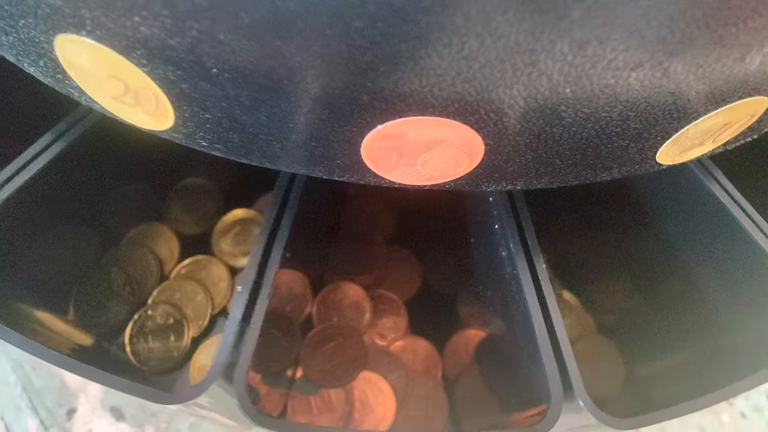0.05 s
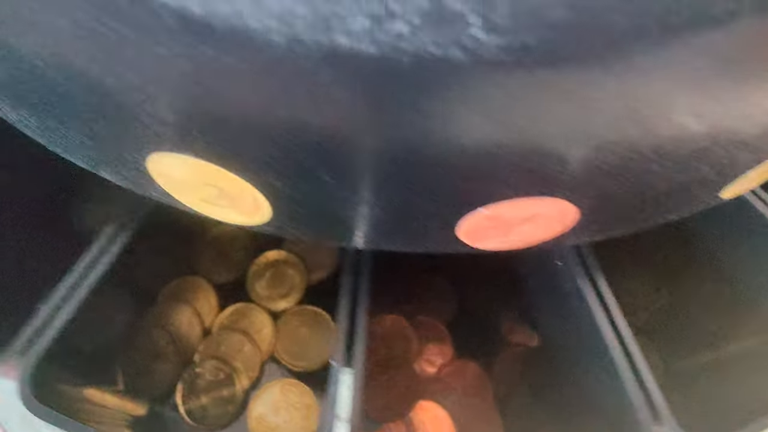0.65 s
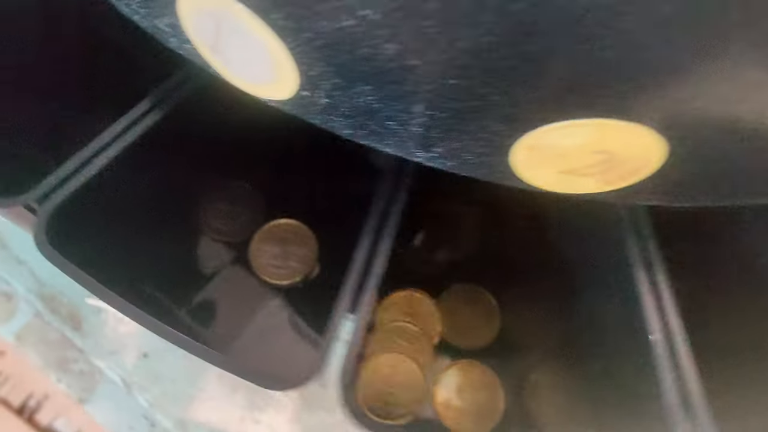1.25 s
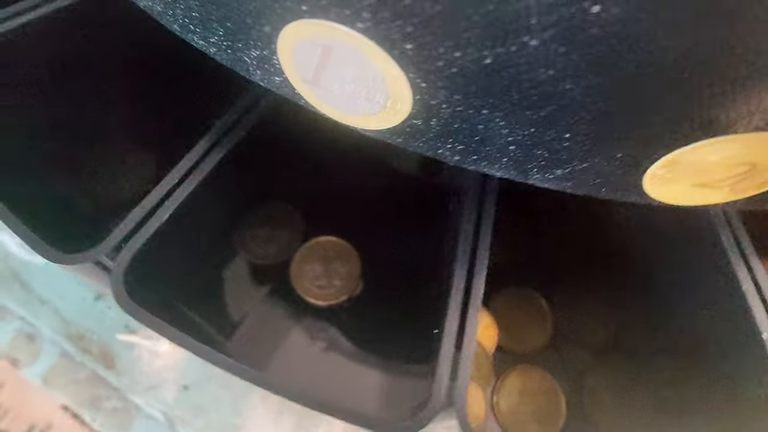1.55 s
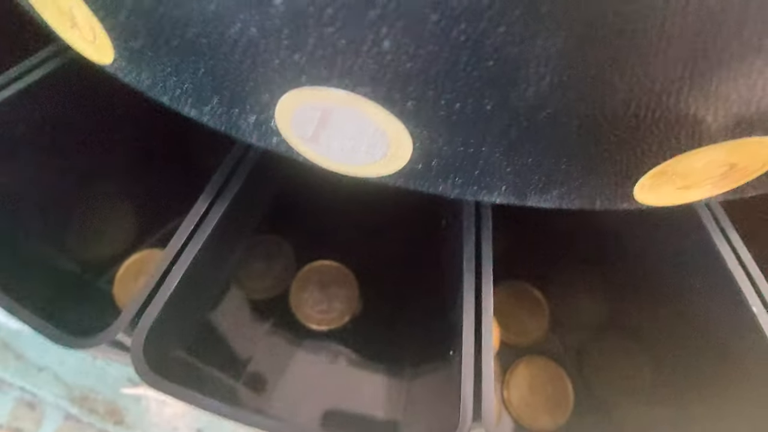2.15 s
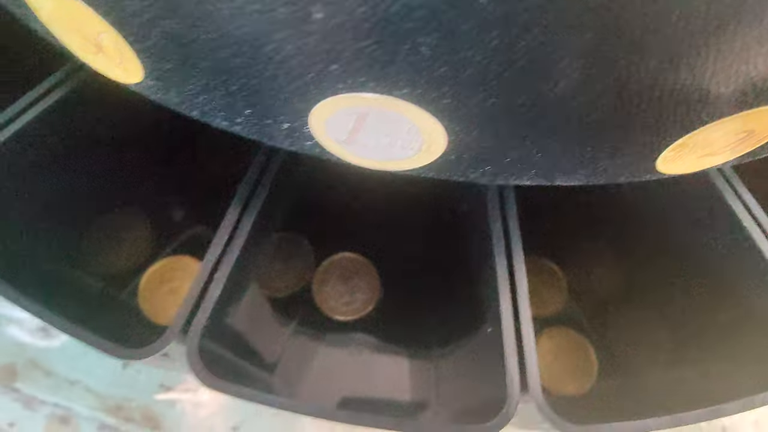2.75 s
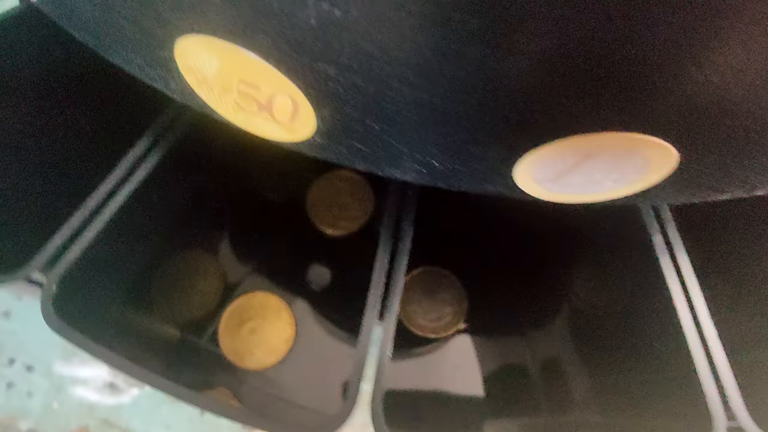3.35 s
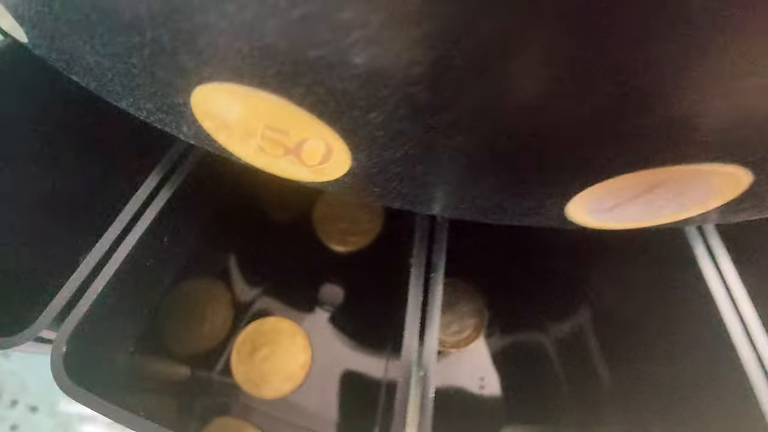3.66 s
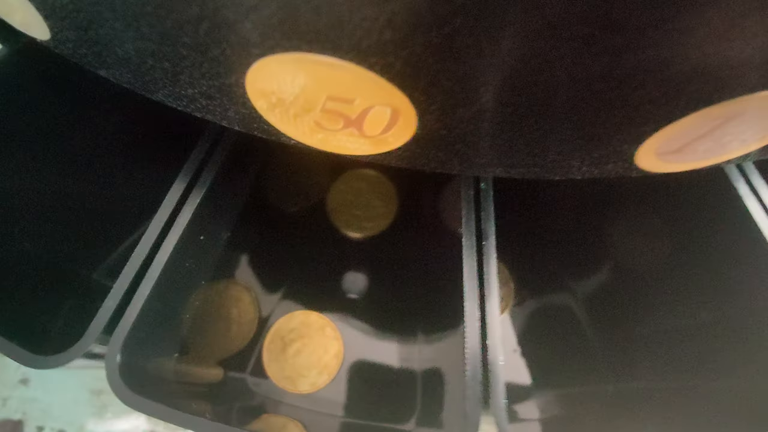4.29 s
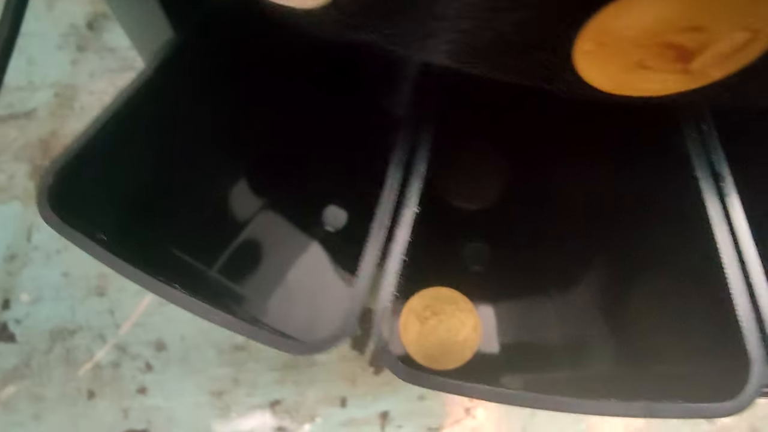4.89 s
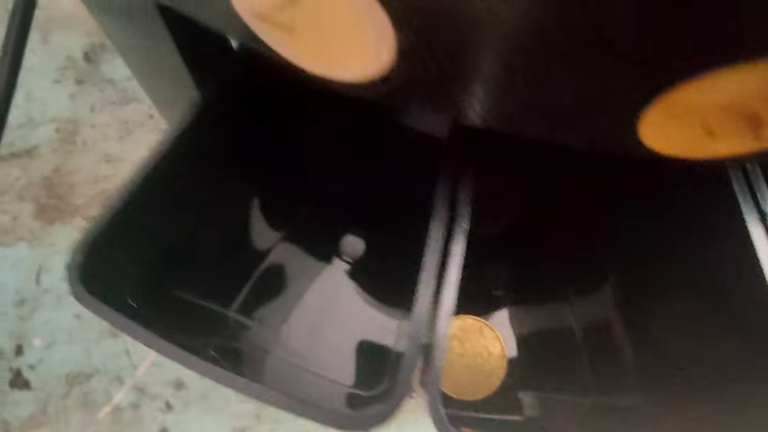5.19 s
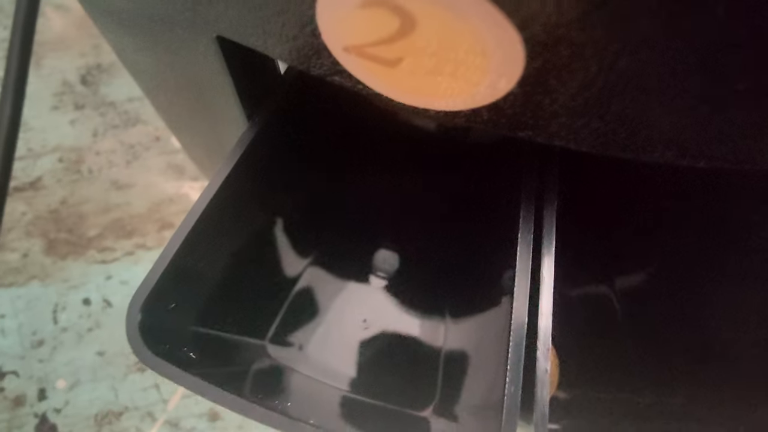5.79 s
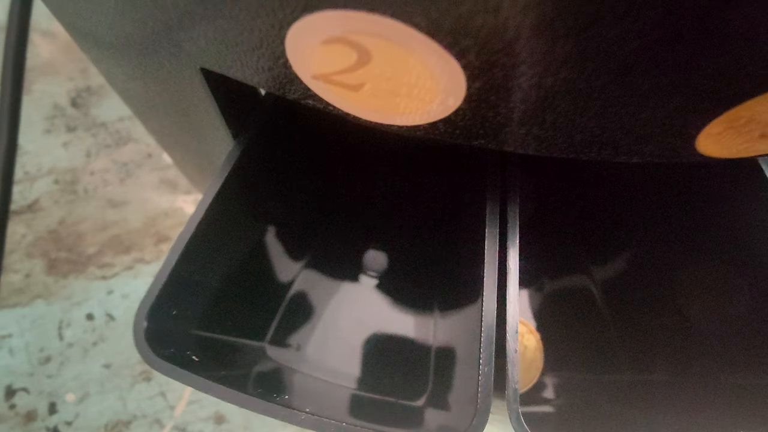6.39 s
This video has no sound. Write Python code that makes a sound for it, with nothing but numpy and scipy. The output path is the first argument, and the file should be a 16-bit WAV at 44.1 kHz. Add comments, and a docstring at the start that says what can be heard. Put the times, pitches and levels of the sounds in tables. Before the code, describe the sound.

An electric coin sorter clatters as coins knock around its plastic housing and clink into bins, stalling briefly to a low hum.

```python
"""Coin sorter, close up

An electric coin sorter in a small room, the stereo microphone just above its bins. Coins churn on the
feed wheel and knock about in the plastic housing; sorted ones drop into the bins, skitter and ring.
The wheel stalls, leaving the motor's mains hum, then takes up again with a few softer knocks."""
import sys
import numpy as np
from scipy import signal
from scipy.fft import rfft, irfft, next_fast_len
from scipy.io import wavfile

SR = 44100
rng = np.random.default_rng(int(sys.argv[2]) if len(sys.argv) > 2 else 0)


def wav_record(signal):
    """Record a signal, one row per channel, as 16-bit PCM in the file named by sys.argv[1]."""
    frames = np.transpose(np.atleast_2d(signal))
    bounded = np.clip(frames, -1, 1)
    # unit amplitude maps onto the largest positive 16-bit level
    quanta = np.round(bounded * 32767).astype(np.int16)
    wavfile.write(sys.argv[1], SR, quanta)


N = 292559
TIME = np.arange(N) / SR
AGE = np.arange(int(.3 * SR)) / SR   # seconds since a blow
STRIKE = int(.012 * SR)   # the opening samples of a blow, which set its level
STALL_S, RESTART_S = 5.36, 6.02   # the wheel stands still between these times


# Coins knocking inside the housing. Each row: start in seconds, level in dB, the spot that is hit.
HOUSING_KNOCKS = [(0.068, -43, "coin"), (0.112, -31, "wheel"), (0.208, -22.5, "wall"),
                  (0.275, -23, "floor"), (0.292, -15.5, "rim"), (0.317, -26, "hub"), (0.373, -27.5, "coin"),
                  (0.501, -21, "floor"), (0.571, -20.5, "rim"), (0.623, -23.5, "floor"),
                  (0.637, -26.5, "floor"), (0.781, -31, "hub"), (0.816, -22.5, "rim"),
                  (0.862, -32, "wheel"), (0.896, -29, "coin"), (0.976, -32, "wheel"), (1.125, -26, "hub"),
                  (1.141, -29.5, "rim"), (1.181, -23, "wheel"), (1.217, -16.5, "rib"),
                  (1.257, -22.5, "wheel"), (1.311, -18.5, "wheel"), (1.326, -24.5, "wall"),
                  (1.38, -26, "floor"), (1.394, -23.5, "coin"), (1.536, -18.5, "wheel"),
                  (1.578, -28.5, "rim"), (1.623, -19, "floor"), (1.642, -27, "coin"), (1.671, -25, "rib"),
                  (1.817, -21.5, "wheel"), (1.898, -27, "edge"), (1.927, -30.5, "coin"),
                  (2.063, -31, "coin"), (2.134, -19, "wall"), (2.192, -25, "edge"), (2.525, -29.5, "wheel"),
                  (2.55, -28, "wall"), (2.634, -19, "wheel"), (2.671, -25, "wheel"), (2.722, -28.5, "rib"),
                  (2.844, -26.5, "rim"), (3.092, -37.5, "wheel"), (3.143, -22.5, "rim"),
                  (3.21, -31.5, "wall"), (3.234, -17.5, "wall"), (3.279, -30, "wall"),
                  (3.385, -22.5, "wheel"), (3.726, -19, "wheel"), (3.783, -20.5, "wall"),
                  (3.83, -28, "rib"), (3.971, -25, "rim"), (4.006, -29, "rim"), (4.242, -39, "hub"),
                  (4.281, -22.5, "wheel"), (4.354, -27.5, "hub"), (4.386, -17, "hub"),
                  (4.551, -22, "wheel"), (4.6, -31, "edge"), (4.618, -25.5, "edge"),
                  (4.772, -23.5, "wheel"), (4.822, -20, "wheel"), (4.9, -21, "edge"), (4.932, -25, "wall"),
                  (4.976, -27, "rib"), (5.098, -19, "wheel"), (5.137, -18.5, "floor"),
                  (5.171, -31.5, "coin"), (5.284, -34, "floor"), (5.382, -45, "hub"), (6.171, -30.5, "rim"),
                  (6.182, -23.5, "hub"), (6.224, -29, "rib"), (6.257, -30.5, "wheel"),
                  (6.343, -33, "wheel"), (6.435, -34.5, "wheel"), (6.577, -32.5, "rib")]
# Spots a coin can hit there. Each row: name, body and brightness in dB relative to the blow, ring in Hz.
HOUSING_SPOTS = [("floor", 1.5, -1, 780), ("wall", -0.5, 0, 1110), ("hub", -6, -9, 1880),
                 ("wheel", -7, -3.5, 2300), ("rib", -12, -8, 2660), ("rim", -3, -0.5, 2740),
                 ("coin", -23, 5, 3400), ("edge", -16, -6, 4480)]

def knocks(hits):
    """Coins strike the inside of the housing: a plastic clack with a metal click on top."""
    clacks = blows(hits, rise_s=0.00061, crack_db=3, crack_t60=0.0016,
                   tail_db=-24, spot_db=11, spot_width_hz=87)
    return clacks + edge_clicks(hits, level_db=-14)


def blows(hits, rise_s, crack_db, crack_t60, tail_db, spot_db, spot_width_hz, boom_db=-15, pan_db=1.3):
    """A blow sets off a dense burst of plastic modes: lows last longest, and the hollow case booms."""
    out = np.zeros((2, N))
    registers = [band(607, 1280), band(1690, 4440), band(6000, 15000, order=2)]   # body, clack, bright
    crack_and_tail = from_db(crack_db) * dying(crack_t60) + from_db(tail_db) * dying(0.2)
    decays = np.array([dying(t60) + crack_and_tail for t60 in (.058, .04, .024)])   # one per register
    for start, db, body_db, bright_db, spot_hz in hits:
        softness_db = -0.54 * bright_db   # dull blows are glancing: they swell more slowly and ring more
        swell = 1 - np.exp(-AGE / (rise_s * from_db(softness_db)))
        burst = noise(len(AGE))
        pan = from_db(pan_db * rng.standard_normal() * np.array([[1], [-1]]))
        shells = housing(burst * swell * decays[:, None])
        shells = spot_modes(shells, spot_hz, spot_db + softness_db, spot_width_hz)
        for sos, shell, register_db in zip(registers, shells, (body_db, 0, bright_db)):
            clack = rms_one(signal.sosfilt(sos, shell), STRIKE)
            add(out, start, pan * from_db(db + register_db) * clack)
        boom = rms_one(case(burst * dying(0.14)), 2 * STRIKE)
        add(out, start, from_db(db + body_db / 2 + boom_db) * boom)
    return out


def spot_modes(x, hz, db, width_hz, stray_db=5):
    """The struck spot rings at its own pitch, and every blow favours a few more modes by chance."""
    stray_hz = np.exp(rng.uniform(np.log(800), np.log(11000), 9))
    strays = sum(resonance(x, f, 90 + f / 60) for f in stray_hz)
    return x + from_db(db) * resonance(x, hz, width_hz) + from_db(stray_db) * strays


def edge_clicks(hits, level_db, t60=0.00056, lag_s=0.00024):
    """Hard metal edges meet in a short spike that reaches the microphone's two sides a little apart."""
    out, spike = np.zeros((2, N)), band(2500, 14000, order=1)
    for start, db, _, bright_db, _ in hits:
        click = rms_one(signal.sosfilt(spike, rng.standard_normal(len(AGE)) * dying(t60)), STRIKE)
        pair = np.array([np.roll(click, int(delay * SR)) for delay in rng.uniform(0, lag_s, 2)])
        add(out, start + .001, from_db(db + bright_db + level_db) * pair)
    return out


def rebounds(hits, gap_s=0.012, spread_db=3):
    """A coin seldom hits only once: its edge touches again a moment later."""
    draws = rng.standard_normal((len(hits), 2))
    touches = [(start + gap_s * np.exp(late / 2), db + spread_db * hard, *colour)
               for (start, db, *colour), (late, hard) in zip(hits, draws)]
    return edge_clicks(touches, level_db=-21.5)


def panel_ring(hits, level_db=-18, t60_at_1khz=0.13, detune=0.011):
    """The struck panel rings on after the blow in a close pair of modes, the lower the longer."""
    out = np.zeros((2, N))
    for start, db, _, _, spot_hz in hits:
        hz = spot_hz * (1 + detune * rng.standard_normal((2, 1, 1)))
        phase = rng.random((2, 1, 1)) + 0.12 * rng.standard_normal((2, 2, 1))
        modes = np.sin(2 * np.pi * (hz * AGE + phase)).sum(axis=0)
        t60 = t60_at_1khz * (spot_hz / 1000) ** -0.4
        add(out, start, from_db(db + level_db) * modes * dying(t60) * (1 - dying(0.01)))
    return out


def jingle(hits, level_db=-16, t60=.42, partials=4):
    """Coins knocked about inside ring on faintly, too."""
    out = np.zeros((2, N))
    for start, db, _, bright_db, _ in hits:
        hz = rng.uniform(13400, 15700, (partials, 1, 1))
        phase = rng.random((partials, 2, 1))
        ring = np.mean(np.sin(2 * np.pi * (hz * AGE + phase)), axis=0)
        add(out, start, from_db(db + bright_db / 2 + level_db) * ring * dying(t60))
    return out


# Resonances of the plastic housing. Each row: frequency in Hz, width in Hz, boost in dB.
HOUSING_MODES = [(773, 190, 4), (1085, 96, 7), (1644, 600, 3.5), (2280, 390, 4), (2765, 21, 3),
                 (3650, 900, 2), (4510, 1100, 2.5), (7030, 910, 7.5)]

def housing(x):
    """The plastic shell colours the coins' sound on its way to the microphone."""
    return x + sum((from_db(db) - 1) * resonance(x, hz, width) for hz, width, db in HOUSING_MODES)


# Hollow modes of the whole case. Each row: frequency in Hz, width in Hz, relative level in dB.
CASE_MODES = [(147.2, 9.3, -3), (212, 30.6, 0.5), (233, 19.6, 5), (299, 56, -3.5), (384.3, 20.6, -3.5),
              (554.4, 75, -2.5)]

def case(x):
    """The hollow case booms in a few low modes, and radiates little below them."""
    boom = sum(from_db(db) * resonance(x, hz, width) * (-1) ** k
               for k, (hz, width, db) in enumerate(CASE_MODES))
    return signal.sosfilt(band(120, 750, order=2), boom)


# Sorted coins landing just below the microphone. Each row: start in seconds, level in dB, what is hit,
# size of coin, skitter length in seconds, then the levels of skitter, ring and thump in dB.
BIN_DROPS = [(0.148, -19, "pile", "small", 0.054, -29, -25, -46.5),
             (0.411, -20.5, "bin floor", "small", 0.087, -33.5, -24, -45),
             (1.042, -19.5, "bin floor", "medium", 0.056, -50, -43, -45),
             (1.354, -24, "bin floor", "large", 0.27, -33.5, -31, -43),
             (1.735, -18, "pile", "small", 0.09, -26, -23, -58),
             (1.991, -19, "pile", "medium", 0.27, -35.5, -33.5, -49),
             (2.311, -21.5, "bin floor", "medium", 0.046, -32.5, -23, -55),
             (2.828, -17.5, "bin wall", "medium", 0.1, -33, -22, -56),
             (3.333, -18, "bin wall", "large", 0.21, -34, -20.5, -39),
             (3.467, -21.5, "bin floor", "large", 0.087, -34, -20.5, -49),
             (3.928, -21, "pile", "small", 0.12, -32.5, -20, -45),
             (4.478, -16, "bin wall", "medium", 0.11, -31.5, -28, -50),
             (4.762, -21, "bin wall", "small", 0.11, -38, -20, -71),
             (5.016, -20, "bin floor", "medium", 0.072, -36, -31, -50),
             (5.149, -28.5, "pile", "medium", 0.1, -36.5, -42, -57),
             (5.304, -23, "bin floor", "medium", 0.051, -31, -29.5, -49)]
# What a coin lands on. Each row: name, body and brightness in dB relative to the blow, ring in Hz.
BIN_SPOTS = [("pile", -15, -1.5, 3560), ("bin floor", -5, 0.5, 2200), ("bin wall", -16.5, -2.9, 2280)]

def landings():
    """A falling coin hits the pile, the bin floor or the bin wall with a clack and a sharp click."""
    hits = struck(BIN_DROPS, BIN_SPOTS)
    clacks = blows(hits, rise_s=0.0016, crack_db=5.5, crack_t60=0.00097,
                   tail_db=-18, spot_db=12, spot_width_hz=120)
    return clacks + edge_clicks(hits, level_db=-4)


def skitter(slope_db_per_s=-45, shine_db=5):
    """The coin chatters against the pile and the bin wall in a run of bright little contacts."""
    out = np.zeros((2, N))
    for start, *_, length, skitter_db, _, _ in BIN_DROPS:
        contacts = noise(len(AGE)) * grains(len(AGE), per_s=240, spread_db=3.5, fade_s=.004)
        shape = settling(length, stop_t60=0.13) * from_db(slope_db_per_s * (AGE - length / 2))
        add(out, start, from_db(skitter_db) * rms_one(contacts * shape, int(length * SR)))
    out = out + from_db(shine_db) * resonance(out, 3400, 1000)   # the thin bin wall rings
    return signal.sosfilt(band(1500, 15000, order=1), housing(out))


def settling(hold_s, stop_t60):
    """Envelope of a landed coin: it keeps bouncing for a moment, then settles."""
    return dying(stop_t60, np.maximum(AGE - hold_s, 0)) * (1 - np.exp(-AGE / 0.0012))


# The high ring of the coins. Each entry: size of coin, frequency in Hz.
COIN_RING_HZ = {"large": 13975, "medium": 15340, "small": 15720}

def coin_rings(level_db=0.5, first_touch_db=4, bounce_s=0.013, spread_db=5, upset_turns=0.6):
    """Each coin rings in a thin tone that every bounce upsets; near-equal coins beat against it."""
    out = np.zeros((2, N))
    bounces = np.arange(int(AGE[-1] / bounce_s) + 2) * bounce_s
    for start, *_, size, length, _, ring_db, _ in BIN_DROPS:
        ring = np.zeros((2, len(AGE)))
        for ratio, partial_db in [(1, 0), (.984, -4), (.994, -4), (.957, -8)]:
            for side in range(2):
                strength = np.interp(AGE, bounces, from_db(spread_db * rng.standard_normal(len(bounces))))
                phase = np.interp(AGE, bounces, np.cumsum(upset_turns * rng.uniform(-1, 1, len(bounces))))
                tone = np.sin(2 * np.pi * (COIN_RING_HZ[size] * ratio * AGE + phase + rng.random()))
                ring[side] += from_db(partial_db) * strength * tone
        ring *= settling(0.41 * length, stop_t60=0.21) * (1 + from_db(first_touch_db) * dying(0.1))
        add(out, start, from_db(ring_db + level_db) * rms_one(ring, int(length * SR)))
    return out


def after_ring(level_db=-23, t60=0.42, detune_hz=23):
    """A coin that comes to rest leaning on others keeps a faint, beating thread of its ring."""
    out, age = np.zeros((2, N)), TIME[:SR]
    for start, *_, size, _, _, ring_db, _ in BIN_DROPS:
        pair_hz = COIN_RING_HZ[size] + detune_hz * rng.standard_normal((2, 1, 1))
        tone = np.sin(2 * np.pi * (pair_hz * age + rng.random((2, 2, 1)))).sum(axis=0)
        add(out, start, from_db(ring_db + level_db) * tone * dying(t60, age))
    return out


def thumps(t60=0.14):
    """The bin floor gives a little under each landing."""
    out, low = np.zeros((2, N)), band(27, 160, order=2)
    for start, *_, thump_db in BIN_DROPS:
        thump = signal.sosfilt(low, noise(len(AGE)) * dying(t60))
        add(out, start, from_db(thump_db) * rms_one(thump, 4 * STRIKE))
    return out


# Coins juddering along the wall. Each row: start and length in seconds, level in dB, squeak in Hz.
WALL_JUDDERS = [(0.01, 0.067, -26, 2680), (0.864, 0.067, -32, 2870), (1.196, 0.1, -32, 2610),
                (1.42, 0.097, -28, 2440), (2.196, 0.06, -30, 2910), (2.697, 0.042, -22.5, 2720),
                (3.31, 0.013, -22, 2820), (3.824, 0.051, -24, 2640), (4.642, 0.0317, -27, 2620),
                (4.908, 0.039, -28, 3100), (5.169, 0.054, -23.5, 2450), (6.428, 0.07, -35.5, 2300)]

def judders(squeak_gain=1.562, rub_db=-13, ramp_s=0.0053):
    """A coin's edge sticks and slips, keeping a narrow resonance going over a little rubbing noise."""
    out, rub_band = np.zeros((2, N)), band(1100, 4200, order=1)
    for start, length, db, hz in WALL_JUDDERS:
        slips = noise(len(AGE)) * grains(len(AGE), per_s=370, spread_db=1, fade_s=0.0044)
        slips *= np.clip(np.minimum(AGE, length + ramp_s - AGE) / ramp_s, 0, 1)
        squeak = squeak_gain * resonance(slips, hz, width_hz=110)
        rub = from_db(rub_db) * signal.sosfilt(rub_band, housing(slips))
        add(out, start, from_db(db) * rms_one(squeak + rub, int(length * SR)))
    return out


# Steady rubbing of the coins that ride on the wheel. Each row: time in seconds, level in dB.
WHEEL_LOAD = [(0.0, -30.5), (0.7, -31.5), (0.92, -41), (1.3, -28), (1.65, -34), (2.45, -46.5),
              (3.15, -52.5), (3.42, -25.5), (3.68, -45.5), (4.7, -53), (6.63, -47)]

def stirring(shake_db=-12, settle_t60=0.43):
    """How busy the loose coins are, in dB: the wheel rubs them, and each blow shakes them up briefly."""
    kicks = np.zeros(N)
    for start, db, *_ in HOUSING_KNOCKS + BIN_DROPS:
        kicks[int(start * SR)] += from_db(db + shake_db) ** 2
    shaken = signal.lfilter([1], [1, -np.exp(-2 * np.log(1000) / (settle_t60 * SR))], kicks)
    rubbed = (turning() * from_db(np.interp(TIME, *np.transpose(WHEEL_LOAD)))) ** 2
    return 10 * np.log10(rubbed + shaken + 1e-12)


def turning(stop_s=0.06, take_up_s=0.049):
    """1 while the wheel turns, 0 while it is stalled."""
    return np.clip(np.maximum((STALL_S - TIME) / stop_s, (TIME - RESTART_S) / take_up_s), 0, 1)


# Spectrum of coins churning on the wheel. Each row: frequency in Hz, relative level in dB.
CHURN_SPECTRUM = [(200, -11.5), (400, -5), (700, 2), (1400, -2), (2600, 2), (4500, -15), (7000, -20.5),
                  (10000, -38), (15500, -26)]

def wheel(stir_db, churn_db=-2, rumble_db=-47, rumble_growth=0.58, busy_db=-35):
    """Coins rub and tick on the turning wheel; the case rumbles more the busier they are."""
    ticks = noise(N, CHURN_SPECTRUM) * grains(N, per_s=240, spread_db=3.4, fade_s=.010)
    churn = from_db(stir_db + churn_db) * rms_one(housing(ticks))
    rumble = from_db(rumble_db + rumble_growth * (stir_db - busy_db)) * rms_one(case(noise(N)))
    return churn + rumble


def pile_ticks(stir_db, level_db=-7):
    """Loose coins nudge each other with small bright ticks, louder the busier the wheel."""
    contacts = noise(N) * grains(N, per_s=70, spread_db=4.2, fade_s=0.006)
    ticks = signal.sosfilt(band(2300, 15000, order=1), housing(contacts))
    return from_db(stir_db + level_db) * rms_one(ticks)


def restart_scrape(swell_s=0.14, level_db=-44):
    """As the wheel takes up again, the last coins drag along the wall with a light scraping rattle."""
    # Resonances of the rubbed wall. Each row: frequency in Hz, width in Hz, relative level in dB.
    wall = [(1420, 120, -18), (1620, 88, 5), (1810, 140, 13), (2330, 200, 10.5),
            (2810, 96, -16), (6450, 3000, -0.5), (12700, 4000, -8)]
    slips = noise(N) * grains(N, per_s=160, spread_db=3, fade_s=.008)
    scrape = sum(from_db(db) * resonance(slips, hz, width) for hz, width, db in wall)
    return from_db(level_db) * np.clip((TIME - RESTART_S) / swell_s, 0, 1) * rms_one(scrape)


# The motor's hum. Each row: frequency in Hz, rms level in dB while turning, then while stalled.
MOTOR_HUM = [(103, -84.5, -70), (195.6, -56.5, -54)]

def motor(shudder_db=-69):
    """Mains hum, louder while the motor is stalled, and a slight shudder of the case."""
    turns, hum = turning(), np.zeros(N)
    for hz, turning_db, stalled_db in MOTOR_HUM:
        rms = from_db(stalled_db + turns * (turning_db - stalled_db))
        hum += rms * np.sqrt(2) * np.sin(2 * np.pi * (hz * TIME + rng.random()))
    return hum + from_db(shudder_db) * rms_one(case(noise(N)))


def room(x, wet_db=-24, t60=0.51):
    """This close to the machine, the small room adds only a faint, dull reverberation."""
    tail = noise(len(AGE)) * dying(t60) * (1 - dying(0.028))
    response = rms_one(signal.sosfilt(band(120, 6000, order=1), tail)) / np.sqrt(len(AGE))
    return x + from_db(wet_db) * signal.fftconvolve(x, response, axes=1)[:, :N]


# Room tone at the microphone. Each row: frequency in Hz, relative level in dB.
AIR_SPECTRUM = [(18, -59), (30, -41.5), (93, -9), (145, -17), (199, -12), (287, -44), (526, -19.5),
                (1250, -26), (11100, -31), (16000, -50)]

def room_air(level_db=-67):
    """The faint, steady air of the room behind the machine."""
    return from_db(level_db) * noise(N, AIR_SPECTRUM)


# How alike the microphone's two sides are. Each row: frequency in Hz, correlation from 0 to 1.
STEREO_LIKENESS = [(200, 0.98), (400, 0.92), (750, 0.63), (1300, 0.75), (2600, 0.17), (5000, 0.26),
                   (15000, 0.05)]

def noise(size, spectrum=None):
    """Stereo noise, alike on both sides in the bass and less so in the treble."""
    padded = next_fast_len(size)
    hz = np.fft.rfftfreq(padded, 1 / SR)
    mid, side = rfft(rng.standard_normal((2, padded)))
    alike = np.clip(at_hz(STEREO_LIKENESS, hz), 0, 1)
    both = np.sqrt(1 + alike) * mid + np.sqrt(1 - alike) * side * [[1], [-1]]
    if spectrum is not None:
        both *= from_db(at_hz(spectrum, hz))
    return rms_one(irfft(both, padded)[:, :size])


def grains(size, per_s, spread_db, fade_s):
    """Envelope of many tiny contacts of uneven strength."""
    contacts = rng.random(size) < per_s / SR
    energy = contacts * from_db(2 * spread_db * np.clip(rng.standard_normal(size), -2, 2))
    return rms_one(np.sqrt(signal.lfilter([1], [1, -np.exp(-2 / (fade_s * SR))], energy + 1e-9)))


def struck(events, spots):
    """Give each blow's start and level the body, brightness and ring of the spot it hits."""
    colours = {name: colour for name, *colour in spots}
    return [(start, db, *colours[name]) for start, db, name, *_ in events]


def resonance(x, hz, width_hz):
    """Two-pole resonance with gain 1 at its peak."""
    r = np.exp(-np.pi * width_hz / SR)
    poles = [1, -2 * r * np.cos(2 * np.pi * hz / SR), r * r]
    return signal.lfilter(np.array([1, 0, -1]) * (1 - r * r) / 2, poles, x)


def band(low_hz, high_hz, order=3):
    """A band-pass filter."""
    return signal.butter(order, [low_hz, high_hz], "band", fs=SR, output="sos")


def at_hz(points, hz):
    """Read a spectrum on a log-frequency axis."""
    point_hz, value = np.transpose(points)
    return np.interp(np.log(hz + 1), np.log(point_hz), value)


def dying(t60, age=AGE):
    """Exponential decay, 60 dB down after t60 seconds."""
    return np.exp(-np.log(1000) * age / t60)


def from_db(db):
    """Decibels to gain."""
    return 10 ** (np.asarray(db) / 20)


def rms_one(x, count=None):
    """Scale so that the first count samples (all by default) have rms 1."""
    return x / np.sqrt(np.mean(x[..., :count] ** 2) + 1e-20)


def add(out, start, sound):
    """Mix a sound in, start seconds from the beginning."""
    at = max(int(start * SR), 0)
    out[:, at:at + sound.shape[1]] += sound[:, :N - at]


def scene():
    """The whole machine in its room, from just above the bins."""
    hits, stir_db = struck(HOUSING_KNOCKS, HOUSING_SPOTS), stirring()
    clatter = knocks(hits) + landings() + rebounds(hits) + panel_ring(hits) + jingle(hits)
    feed = judders() + pile_ticks(stir_db) + wheel(stir_db) + restart_scrape()
    bins = skitter() + coin_rings() + after_ring() + thumps()
    return room(clatter + feed + bins) + motor() + room_air()


def record(dry, ceiling=1.3, cutoff_hz=15900):
    """The microphone chain rounds the highest peaks and cuts the very top of the treble."""
    rounded = ceiling * np.tanh(dry / ceiling)
    return signal.sosfilt(signal.ellip(10, .2, 80, cutoff_hz, fs=SR, output="sos"), rounded)


dry = scene()
out = record(dry)
wav_record(out)
```